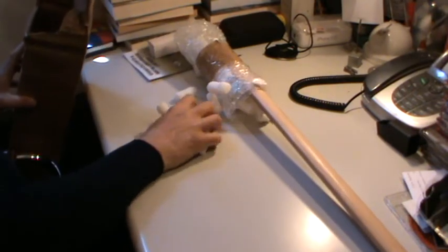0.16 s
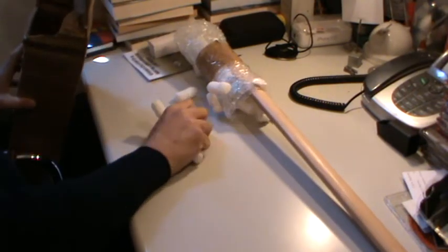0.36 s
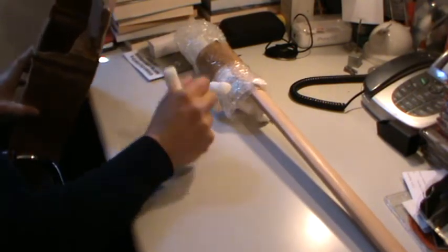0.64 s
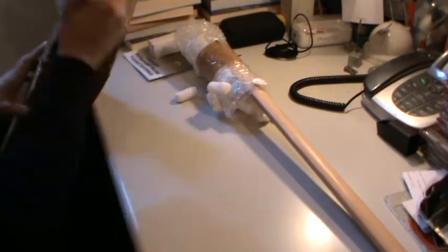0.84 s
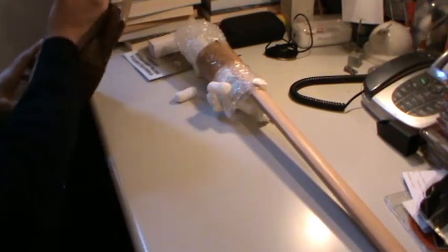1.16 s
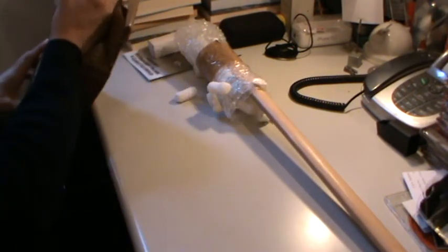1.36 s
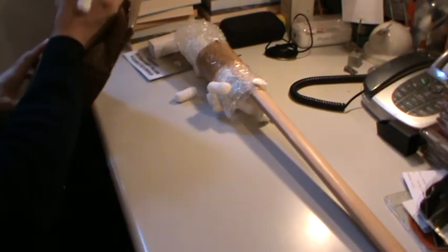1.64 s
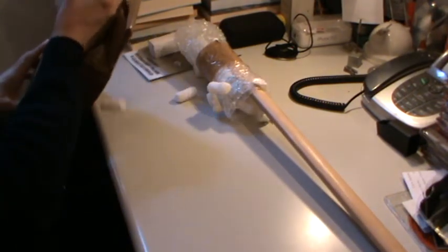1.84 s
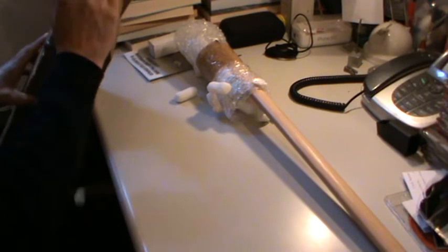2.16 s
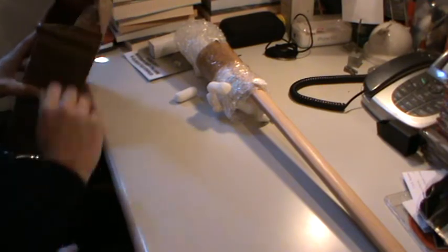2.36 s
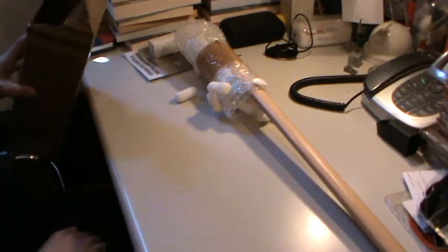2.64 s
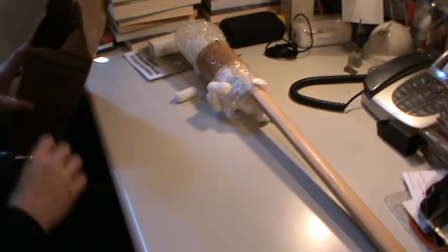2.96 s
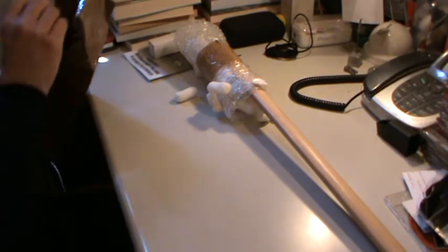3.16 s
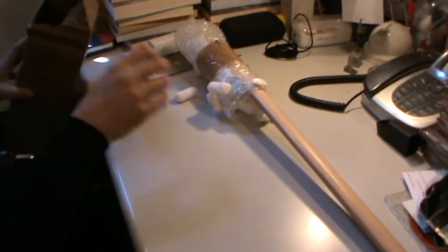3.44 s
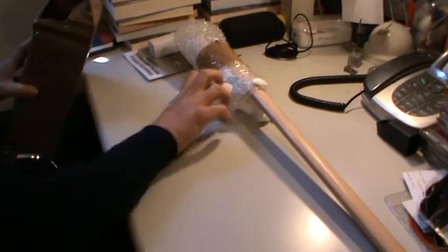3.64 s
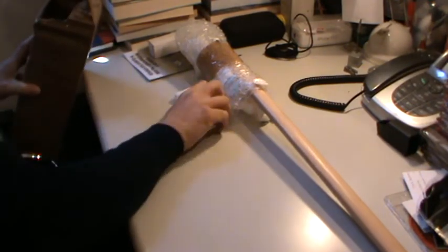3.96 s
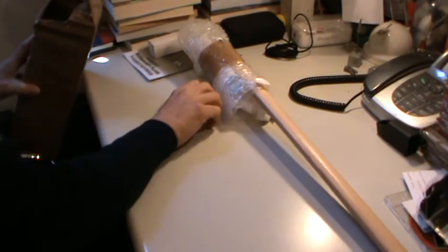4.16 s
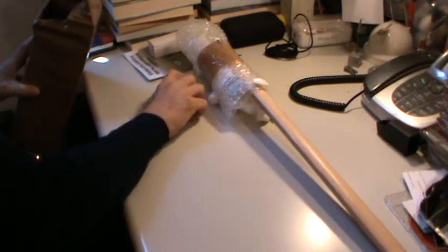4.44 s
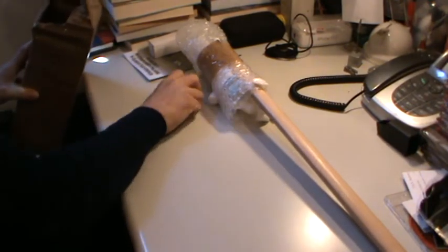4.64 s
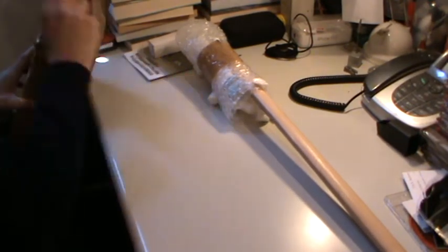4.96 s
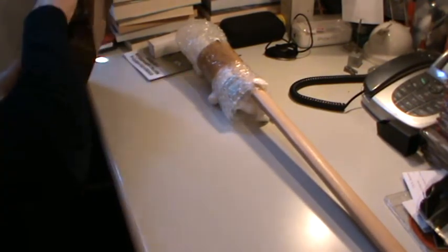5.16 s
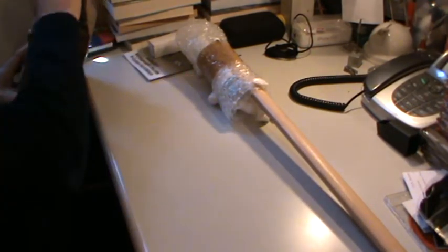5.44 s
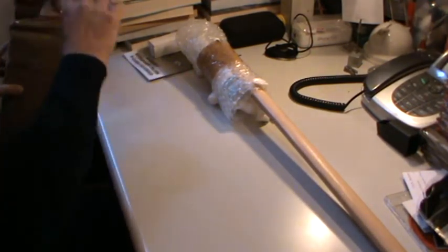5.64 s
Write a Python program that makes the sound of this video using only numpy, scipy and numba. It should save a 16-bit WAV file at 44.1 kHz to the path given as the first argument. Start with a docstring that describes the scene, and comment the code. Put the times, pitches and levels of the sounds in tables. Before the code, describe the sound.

Crisp foam rubbing and sharp little snaps alternate with light hollow knocks in a cardboard tube, ending with a soft thump, close up indoors.

```python
"""On a desk in a quiet room, a hand rakes foam peanuts and drops them into a cardboard tube, close to a small camera.
Foam rubs in dense tiny slips, made as noise under random envelopes, and now and then cracks in short noise bursts.
Knocks and tumbling peanuts ring the tube's modes, and at the end a blow rings the whole tube.
Arm and tube shuffle and thud softly on the desk; a short diffuse tail and a steady room hush lie behind."""
import sys
import numpy as np
from scipy import signal
from scipy.fft import rfft, irfft, next_fast_len
from scipy.io import wavfile
from numba import njit

SR = 44100
rng = np.random.default_rng(int(sys.argv[2]) if len(sys.argv) > 2 else 0)


def store_wav(level_fs):
    """Save 16-bit WAV to argv[1]."""
    pcm = np.round(np.clip(np.atleast_2d(level_fs), -1, 1) * 32767)
    wavfile.write(sys.argv[1], SR, pcm.T.astype(np.int16))


N = 255672
T = np.arange(N) / SR
HZ = np.fft.rfftfreq(next_fast_len(N + SR), 1 / SR)  # bins of the padded spectrum

# colour of foam at the capsule, peak near 8 kHz and notch near 13 kHz:
# (frequency [Hz], relative density [dB])
FOAM_COLOUR = [(290, -55), (500, -9.5), (720, -9.5), (800, -3), (1100, -4.5), (2360, -4), (4870, -7),
               (6800, -7), (7950, -3), (9900, -6), (10900, -10), (12900, -23.5), (13700, -23), (15100, -18),
               (16000, -16)]
# peanuts and fingers knocking the tube: (time [s], level [dB], strongest ring [Hz])
TUBE_KNOCKS = [(0.221, -32, 865), (0.545, -47, 390), (0.564, -47, 480), (0.738, -39, 375),
               (0.791, -45.5, 454), (0.829, -59, 393), (0.859, -50, 580), (1.047, -42, 483),
               (1.087, -27, 210), (1.168, -32.5, 510), (1.199, -31, 790), (1.239, -31, 618),
               (1.259, -41, 673), (1.315, -41, 580), (1.328, -36.5, 470), (1.349, -35.5, 414),
               (1.396, -35, 480), (1.408, -30, 555), (1.456, -41, 724), (1.5, -47, 614), (1.582, -52, 479),
               (1.721, -39, 420), (1.749, -50, 363), (1.779, -41, 400), (1.797, -33.5, 568),
               (1.827, -39, 605), (1.8614, -30.5, 490), (1.889, -56, 445), (1.941, -36, 573),
               (2.001, -36, 353), (2.025, -36, 395), (2.055, -35.5, 670), (2.062, -33, 350),
               (2.088, -43, 676), (2.208, -50, 549), (2.31, -46, 760), (2.562, -39, 780), (3.292, -45, 410),
               (3.325, -30.5, 670), (3.354, -44, 684), (3.466, -51, 590), (3.546, -46, 400),
               (3.645, -44, 807), (4.053, -41, 638), (4.478, -35, 396), (4.564, -39.5, 804),
               (5.128, -32.5, 590), (5.163, -36.5, 577), (5.194, -24.5, 600), (5.228, -34, 670),
               (5.246, -43, 573), (5.275, -32.5, 462), (5.312, -33, 600), (5.36, -50, 436),
               (5.399, -41, 336), (5.446, -39.5, 430), (5.498, -56, 447), (5.668, -61, 510)]
# arm or tube meeting the desk: (time [s], level [dB], ring [Hz])
DESK_THUDS = [(0.034, -48, 112), (1.075, -55, 175), (1.128, -46, 161), (1.93, -62, 127), (3.628, -54, 112),
              (4.038, -59, 108), (4.484, -57, 158), (4.61, -58, 104), (5.131, -55.5, 80)]
KNOCK_LAG_S = 0.002096  # short wait between each listed knock time and its ring


def undb(db):
    """Amplitude from dB."""
    return 10 ** (np.asarray(db) / 20)


def unit(x):
    """Scale to an RMS of 1."""
    return x / np.sqrt(np.mean(np.abs(x) ** 2))


def on_hz(table):
    """A (Hz, value) table read at every bin, straight on a log axis."""
    hz, value = np.transpose(table)
    return np.interp(np.log(HZ + 1), np.log(hz + 1), value)


def shape(x, gain):
    """Filter by a gain per bin."""
    return irfft(rfft(x, 2 * len(HZ) - 2) * gain)[..., :N]


def slips(per_s, spread_db, decay_ms):
    """Power envelope of random slips, most small, a few large; mean 1."""
    size = undb(2 * spread_db * rng.exponential(size=N))
    kicks = (rng.random(N) < per_s / SR) * size
    # the matching amplitude falls to 1/e in decay_ms
    power = signal.lfilter([1], [1, -np.exp(-2000 / (decay_ms * SR))], kicks)
    return power / power.mean()


def ring(x, hz, t60):
    """One mode, a decaying sine that falls 60 dB in t60 seconds."""
    pole = np.exp(2j * np.pi * hz / SR - np.log(1000) / (t60 * SR))
    return signal.lfilter([1], [1, -pole], x).imag


def swell(s, hold_s, rise_db_s, db, fall_db_s):
    """Power that rises to db, holds and falls, on straight lines in dB."""
    before = np.maximum(s - T, 0)
    after = np.maximum(T - s - hold_s, 0)
    return undb(2 * (db - rise_db_s * before - fall_db_s * after))


def foam():
    """Slips shake desk, foam body and foam skin together; each part also slips on its own."""
    levels, hollow = rubbing()
    crack_levels = cracks()
    # four bands: desk drag, rasp, scrape, fizz
    below = [1 / (1 + (HZ / edge) ** 12) for edge in (2300, 4000, 6500)]
    shares = np.clip(np.diff([0 * HZ, *below, 0 * HZ + 1], axis=0), 0, 1)
    sharpness = [1.1, 2.4, 1.02, 3.74]  # Q of the hollow in each band
    shared = slips(600, 0.29, decay_ms=1.)
    out = 0
    for k, hz in enumerate(hollow):
        own = slips(300, 2.2, decay_ms=2.5)
        envelope = levels[k] * np.sqrt(.35 + .35 * shared + .3 * own) + crack_levels[k]
        colour = unit(undb(on_hz(FOAM_COLOUR)) * np.sqrt(shares[k]))
        part = shape(envelope * rng.standard_normal(N), colour)
        # the hollow under the hand lifts one band; single peanuts squeak at pitches scattered round it
        squeak_hz = np.clip(hz * np.exp(0.2 * held(55)), 500, 14000)
        squeak = svf(part, squeak_hz, 23.0)
        lifted = svf(part, hz, sharpness[k])
        out = out + 0.5 * part + undb(-5.5) * lifted + undb(0.5) * squeak
    return out


def rubbing():
    """Level and hollow ring of the four foam bands, summed over the strokes of the hand."""
    # strokes through foam: (time at full level [s], hold [s], rise [dB/s], scrape level 4-6.5 kHz [dB],
    # drag 0.9-2.3 kHz [dB re scrape], rasp 2.3-4 kHz [dB re scrape], fizz 6.5-12 kHz [dB re scrape],
    # hollow's ring in drag [Hz], in fizz [Hz])
    strokes = [(0.0, 0.03, 300, -48.5, -7.5, -10, 3, 1240, 7950),
               (0.138, 0.047, 240, -32, -7.5, -8.5, 1.5, 1390, 8100),
               (0.219, 0.034, 500, -30.5, -1, -1, 4, 1550, 7960),
               (0.38, 0.013, 148, -37, -5, 1.5, 2.5, 1750, 8300),
               (0.47, 0.018, 300, -46, -7.5, -21, 7.5, 1740, 8450),
               (1.046, 0.043, 350, -50, 0, -4, 3.5, 1640, 8400),
               (1.09, 0.037, 300, -44, -4.5, -4.5, 4, 1550, 8600),
               (1.188, 0.046, 393, -31.5, -7.5, -11, -0.5, 1630, 8800),
               (1.33, 0.0054, 500, -41, -7.5, -7, 0, 1620, 8250),
               (1.43, 0.07, 200, -56, -5, -5, 1, 1210, 7800),
               (1.58, 0.083, 100, -61, -19, -12, 2, 1520, 7900),
               (1.79, .005, 988, -47, -5, -14, -9, 1020, 8700),
               (1.911, 0.12, 810, -42, -3, -4, -1.5, 1660, 8500),
               (2.049, 0.0037, 121, -35, -9, -5.5, -3, 1650, 8500),
               (2.16, .06, 400, -42.5, -19, -11, -5, 1780, 7500),
               (2.25, 0.065, 100, -41, -3.5, -1, -1.5, 1590, 7350),
               (2.34, 0.027, 100, -48, -1.5, -1.5, -0.5, 1550, 7500),
               (2.57, 0.0044, 706, -52.5, 1, -13, 4.5, 1110, 7700),
               (2.64, 0.028, 200, -53.5, 3.5, -2, 0, 1660, 7500),
               (2.74, 0.053, 123, -41.5, -2.5, -12, -5.5, 1660, 7200),
               (2.83, 0.012, 150, -40, -5, -7.5, -3.5, 1740, 6960),
               (2.99, 0.023, 90, -52.5, -1.5, -2.5, 4, 1770, 8140),
               (3.08, .03, 150, -59.5, -3, 2, -2, 1850, 7900),
               (3.155, 0.015, 80, -55.5, -2, -3, 1, 1750, 8050),
               (3.271, 0.021, 355, -45, -11.5, -11, -1.5, 1400, 8300),
               (3.654, 0.067, 1210, -38.5, -5.5, -7.5, 4.5, 1350, 8240),
               (3.77, 0.028, 250, -37.5, -2, -7, 4, 1280, 8000),
               (3.888, 0.0067, 100, -40, -1.5, -6, 4.5, 1370, 8100),
               (4.002, 0.038, 304, -42.5, 4, 3, 8, 1530, 8100),
               (4.054, 0.07, 250, -36.5, -2, -7.5, 4, 1394, 7960),
               (4.25, 0.027, 100, -52, 3, -5, 3.5, 1130, 7900),
               (4.41, 0.025, 129, -51.5, -3, -10, -4, 1260, 8200),
               (4.49, .005, 400, -43, -20, -17, -3, 1360, 8100),
               (4.52, 0.029, 100, -45.5, -4.5, -1.5, 5.5, 1400, 8000),
               (4.566, 0.017, 500, -41.5, 0, 0, 2.5, 1460, 7960),
               (4.675, 0.057, 900, -44.5, -4, -3.5, -0.5, 1630, 8140),
               (4.765, 0.018, 200, -50, 0, -1, -2, 1270, 8110),
               (4.811, 0.044, 500, -40, -7.5, -3.5, 1.5, 1370, 8000),
               (4.999, 0.011, 194, -42, -5, -2.5, -2, 1780, 7800),
               (5.1, 0.092, 100, -50, -3, -4, 0.8, 1380, 7950),
               (5.3, 0.054, 100, -52.5, 0, -5, 0.5, 1300, 8340),
               (5.46, 0.028, 71, -41.5, -5.5, -8, 2.5, 1570, 8650)]
    # foam settling between strokes: (drag [dB], rasp [dB], scrape [dB], fizz [dB])
    resting_db = (-63, -67, -69, -66.5)
    # the hollow's ring in the scrape band as the hand opens and closes: (time [s], ring [Hz])
    scrape_ring = [(0, 5300), (.1, 4820), (.5, 5050), (1.17, 4700), (1.4, 5050), (1.91, 5100), (2.04, 4550),
                   (2.15, 5600), (2.3, 5130), (2.7, 5300), (2.9, 4830), (3.1, 5300), (3.27, 4900),
                   (3.75, 5330), (4.0, 5230), (4.62, 5500), (4.68, 4750), (4.85, 5250), (5.05, 4900),
                   (5.5, 5250)]
    rasp_hz, fall_db_s = 3123, 165  # rasp ring stays put; every stroke dies away at the same pace
    power = undb(2 * np.array(resting_db))[:, None] + 0 * T
    total, rings = 1e-30, 0
    for s, hold_s, rise_db_s, db, drag_db, rasp_db, fizz_db, drag_hz, fizz_hz in strokes:
        now = swell(s, hold_s, rise_db_s, db, fall_db_s)
        power = power + now * undb(2 * np.array([[drag_db], [rasp_db], [0], [fizz_db]]))
        total = total + now
        rings = rings + now * np.array([[drag_hz], [fizz_hz]])
    drag_ring, fizz_ring = rings / total  # the stronger stroke sets the pitch
    scrape_hz = np.interp(T, *np.transpose(scrape_ring))
    return np.sqrt(power), [drag_ring, rasp_hz + 0 * T, scrape_hz, fizz_ring]


def cracks():
    """Envelopes of foam cracks in the four bands: a quick rise, then an exponential decay."""
    # foam cracks; the two long bursts near 2.13 s make one bright swish:
    # (time [s], peak level [dB], drag [dB re peak], fizz [dB re peak], decay to 1/e [ms])
    crack_rows = [(0.21, -15, -9, 10, 1.2), (0.216, -1, -10, 2, 1.2), (0.2214, -23, -14, -1, 0.93),
                  (0.2258, 3.5, 5.5, 9.5, 0.47), (0.2313, -13, -20, 11, 0.93), (0.2327, -4, -6, -4, 1.1),
                  (0.461, -24.5, -18, 20, 1.2), (0.4687, -19, -4, 12, 1.5), (0.567, -34, -15, 0, 1.7),
                  (0.705, -26, 1, 13.5, 0.85), (0.8457, -35, -9, 8, 1.3), (1.1842, -18, -29, -1, 1.8),
                  (1.204, -20.5, -23, 19, 2.1), (1.236, -17.5, 3, -6, 1.7), (1.252, -13, -10, -11, 1.8),
                  (1.336, -22.5, 0, 12.5, 1), (1.458, -30, 3, -1, 3.2), (1.7248, -32, -14, 2, 1.3),
                  (1.7992, -25.5, -9, 2, 1.4), (1.8253, -33, -13, 4, 2.6), (1.897, -29, -20, 11, 1.3),
                  (1.9045, -11.5, -2.5, 2.5, 1.5), (1.9134, -37, -14, -17, 1.7), (1.9214, -26, -7, 5, 0.54),
                  (1.938, -9, 6, 6, 0.9), (2.0574, -14, -26, 1, 2.6), (2.0878, -24, -13, 10, 1.7),
                  (2.1244, -28, -6, 16.5, 6.9), (2.133, -29, -12, 11, 9), (2.565, -29, 7, -6, 3),
                  (2.6289, -39, -11, -7, 1.5), (2.862, -27.5, 6, -24, 2.6), (3.298, -28.5, -6, 6, 3),
                  (3.6277, -42, -5, -10, 1.1), (3.653, -48, -19, 16, 3.7), (3.6784, -33, -15, -5, 1.5),
                  (3.7674, -20.5, -3, 9, 2.8), (4.0464, -22, -12, 1, 1.3), (4.319, -37, -5, 18, 0.87),
                  (4.4774, -24, 0, -1, 1.7), (4.4799, -21.5, -2, 9, 3.3), (4.486, -18.5, -15, 3, 3.4),
                  (4.5676, -22, -3, 10, 1.7), (4.6725, -23, -15, -6, 3.8), (4.74, -35, -17, -10, 1.5),
                  (5.194, -32.5, 2, 7, 1.8), (5.2757, -24, -15, -19, 1.9), (5.3138, -36, -5.5, -9, 1.5),
                  (5.45, -36, -16, 8, 1.9), (5.5458, -22, -5, -8, 2)]
    crest_db = 14  # peak of a crack over its noise envelope
    envelopes = np.zeros((4, N))
    age_ms = np.arange(2000) / SR * 1000
    for s, peak_db, drag_db, fizz_db, decay_ms in crack_rows:
        burst = np.minimum(age_ms / .35, 1) * np.exp(-age_ms / max(decay_ms, .2))
        for envelope, band_db in zip(envelopes, (drag_db, -3, -3, fizz_db)):
            envelope[int(s * SR):][:len(burst)] += undb(peak_db - crest_db + band_db) * burst
    return envelopes


def held(per_s):
    """Random values, each held until the next chance moment."""
    return rng.standard_normal(N)[np.cumsum(rng.random(N) < per_s / SR)]


@njit
def svf(x, hz, q):
    """State-variable band-pass with a moving centre, gain 1 there."""
    y, band, low = np.empty(len(x)), 0., 0.
    for i in range(len(x)):
        g = np.tan(np.pi * hz[i] / SR)
        v = (band + g * (x[i] - low)) / (1 + g * (g + 1 / q))
        band, low = 2 * v - band, low + 2 * g * v
        y[i] = v / q
    return y


def tube():
    """Each knock rings all modes, most the ones near its own pitch; small knocks tumble at random in between."""
    # modes: (frequency [Hz], level in the tumble [dB], t60 of a knock [s])
    tube_modes = [(205.4, -20, 0.03), (356, -1, 0.048), (406, 1.5, 0.043), (477, -4.5, 0.12),
                  (575.4, -3, 0.048), (673, -3, 0.045), (712, 1.5, 0.01), (976, -38, 0.11)]
    push = signal.windows.hann(int(0.00025 * SR))
    chance = rng.standard_normal((len(TUBE_KNOCKS), len(tube_modes)))
    tumble = np.sqrt(.15 + .85 * slips(200, 1.8, decay_ms=1.5))
    knocks, rattle = 0, 0
    for k, (hz, db, t60) in enumerate(tube_modes):
        blows = np.zeros(N)
        for (s, peak_db, ring_hz), c in zip(TUBE_KNOCKS, chance[:, k]):
            # modes lose 45 dB per octave from the knock's pitch, 21 dB at most, with some scatter
            off_db = min(45 * abs(np.log2(hz / ring_hz)), 21) + 1.5 * c
            blows[int((s + KNOCK_LAG_S) * SR)] += undb(peak_db - off_db)
        knocks = knocks + ring(blows, hz, t60)
        rung = unit(ring(tumble * rng.standard_normal(N), hz, 0.77 * t60))
        rattle = rattle + (-1) ** k * undb(db) * rung
    knocks = np.convolve(knocks, push / push.sum())[:N]
    # keep the knocks and tumble thin below about 190 Hz
    thin = signal.butter(4, 190, "high", fs=SR, output="sos")
    return signal.sosfilt(thin, knocks + unit(rattle) * tumbling())


def tumbling():
    """Level of the loose tumble: longer spells and a trail after every knock."""
    # spells of peanuts tumbling: (time at full level [s], hold [s], rise [dB/s], level [dB])
    tumbles = [(0.0, 0.18, 300, -57.5), (0.23, .005, 148, -48), (0.563, 0.15, 600, -56.5),
               (0.744, 0.12, 300, -55.5), (1.07, 0.21, 502, -47.5), (1.32, 0.27, 300, -55),
               (1.781, .03, 1500, -46.5), (1.878, .02, 1500, -47), (1.942, 0.14, 300, -44),
               (2.314, .005, 130, -51.5), (3.302, 0.027, 400, -49.5), (3.546, 0.024, 1500, -51.5),
               (3.694, 0.11, 200, -48.5), (4.15, .005, 60, -51), (4.475, .005, 400, -51),
               (5.132, 0.27, 2000, -45.5), (5.445, 0.04, 900, -45.5), (5.762, .1, 113, -52)]
    fall_db_s, rest_db = 134, -75.5
    trail_db, trail_rise_db_s, trail_fall_db_s = -15, 20000, 350  # trail level is re its knock
    spells = sum(swell(*row, fall_db_s) for row in tumbles)
    trails = sum(swell(s + 2 * KNOCK_LAG_S, 0, trail_rise_db_s, db + trail_db, trail_fall_db_s)
                 for s, db, _ in TUBE_KNOCKS)
    return np.sqrt(undb(2 * rest_db) + spells + trails)


def bump():
    """A soft heavy blow rings the whole tube and shakes the peanuts inside, a hiss of foam noise."""
    # the whole tube struck: (frequency [Hz], relative level [dB], t60 [s])
    bump_modes = [(114, 1, 0.027), (228, 6.5, 0.09), (354, 2, 0.082), (558, -0.5, 0.13), (738, -2, 0.14)]
    bump_s, body_db, shake_db = 5.784, -18, -33.5
    blow = np.zeros(N)
    push = signal.windows.hann(int(0.0012 * SR))
    blow[int(bump_s * SR):][:len(push)] = push / push.sum()
    rise = np.clip((T - bump_s) / 0.0034, 0, 1)
    shake = rise * shape(rng.standard_normal(N), unit(undb(on_hz(FOAM_COLOUR))))
    body = sum((-1) ** k * undb(db) * ring(blow, hz, t60) for k, (hz, db, t60) in enumerate(bump_modes))
    return undb(body_db) * body + undb(shake_db) * shake


def sleeve():
    """Dull low noise from arm and tube moving, and soft thuds on the desk."""
    band = signal.butter(2, [45, 130], "band", fs=SR, output="sos")
    out = unit(signal.sosfilt(band, rng.standard_normal(N))) * shuffling()
    push = signal.windows.hann(int(0.0036 * SR))
    for s, peak_db, hz in DESK_THUDS:
        blow = np.zeros(N)
        blow[int(s * SR):][:len(push)] = push / push.sum()
        out += undb(peak_db) * ring(blow, hz, 0.36)
    return out


def shuffling():
    """Level of the low shuffle, which swells round each thud."""
    level_db, hold_s, slope_db_s, rest_db = -68.5, 0.13, 74, -73.5
    moves = sum(swell(s, hold_s, 3 * slope_db_s, level_db, slope_db_s) for s, _, _ in DESK_THUDS)
    return np.sqrt(undb(2 * rest_db) + moves)


def diffuse_tail():
    """Spectra of a short diffuse tail: decaying noise, unlike at the two ports, strongest near 13 kHz."""
    # tail: (frequency [Hz], level [dB re direct])
    tail_colour = [(60, -13), (500, -7.5), (2000, -7.5), (4300, -10.5), (7800, -18.5), (10300, -25),
                   (11500, -1), (13000, 2), (14100, -2), (15500, -24)]
    t60_s = 0.1
    age = np.arange(SR // 2) / SR
    tail = rng.standard_normal((2, len(age))) * undb(-60 * age / t60_s) * (age > .003)
    tail = rfft(tail / np.sqrt(np.sum(tail[0] ** 2)), 2 * len(HZ) - 2)
    return undb(on_hz(tail_colour)) * tail


def room_tone():
    """Steady hush of shaped noise, partly alike and partly opposite at the two ports."""
    # alike part: (frequency [Hz], relative density [dB])
    room_colour = [(15, -42), (25, -11), (117, -3), (190, 4.5), (256, 1), (317, 8), (373, 4), (575, 1),
                   (3520, -5.5), (6920, -3), (8140, -4), (12200, -8.5), (14800, -9), (16000, -11)]
    # opposite part: (frequency [Hz], level [dB re alike part])
    room_side = [(30, -31), (400, -2.5), (1400, 2), (3100, -0.5), (7800, -12.5), (11200, -6), (13400, -10),
                 (15500, -28)]
    alike_db = on_hz(room_colour)
    gains = undb([alike_db, alike_db + on_hz(room_side)])
    mid, side = shape(rng.standard_normal((2, N)), gains)
    return undb(-55) / mid.std() * np.array([mid + side, mid - side])


def scene():
    """Foam, tube and sleeve with their diffuse tail, the bump and the room, at two microphone ports."""
    # (frequency [Hz], phase by which the left port leads [rad])
    lead = [(30, 0.11), (200, 0.41), (800, 0.021), (2100, 0.14), (4300, 0), (8000, 0), (12000, 0.86),
            (14000, 0)]
    # (frequency [Hz], left minus right level [dB])
    lean = [(30, -2), (300, 1.5), (2000, 1), (6000, 0.5), (10000, -0.5), (12700, 5), (14500, 0)]
    near = foam() + tube() + sleeve()
    left = undb(on_hz(lean) / 2) * np.exp(.5j * on_hz(lead))
    ports = np.array([left, 1 / left])
    # the bump differs more between the ports, and leans further left
    bump_pan_db = 1.5
    struck = shape(bump(), ports ** 3.5) * undb([[bump_pan_db / 2], [-bump_pan_db / 2]])
    return shape(near, ports + diffuse_tail()) + struck + room_tone()


def record(dry):
    """The camera rounds the loudest cracks and cuts the top."""
    ceiling, top_hz = .65, 15900
    soft = ceiling * np.tanh(dry / ceiling)
    return signal.sosfilt(signal.ellip(10, .2, 75, top_hz, fs=SR, output="sos"), soft)


dry = scene()
out = record(dry)
store_wav(out)
```